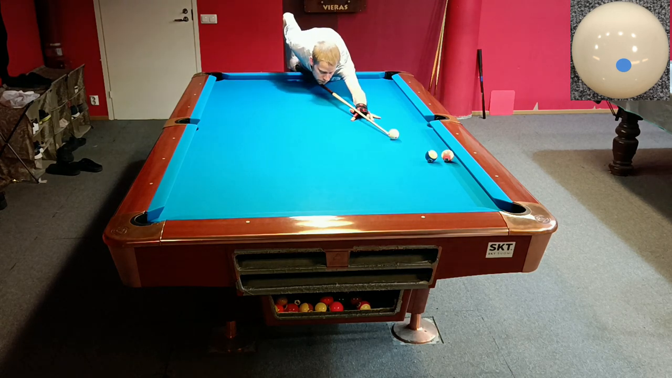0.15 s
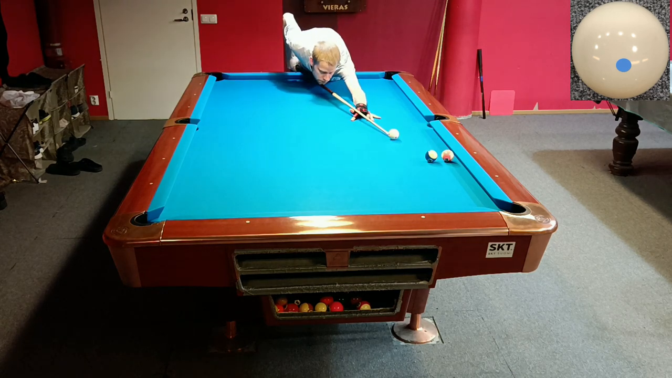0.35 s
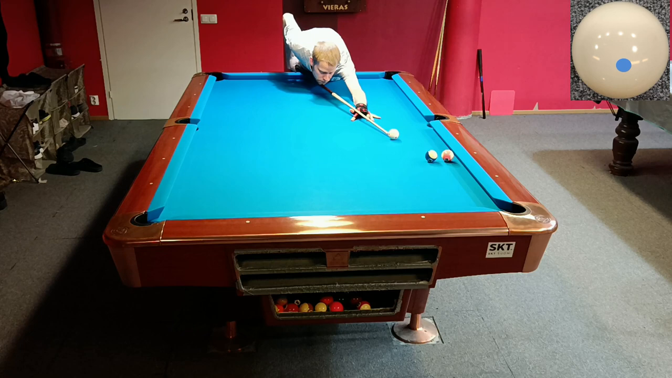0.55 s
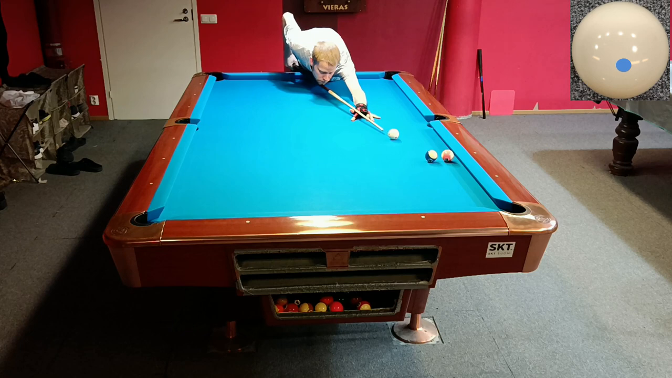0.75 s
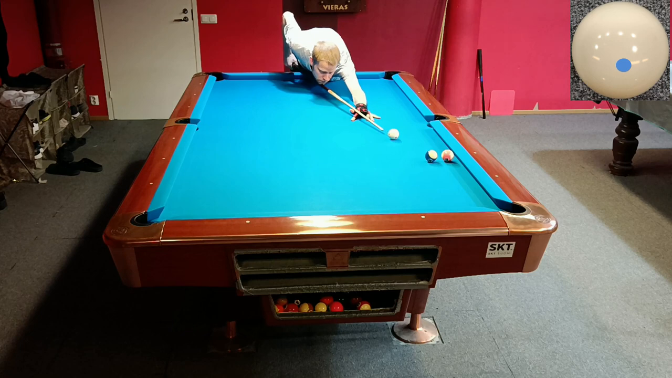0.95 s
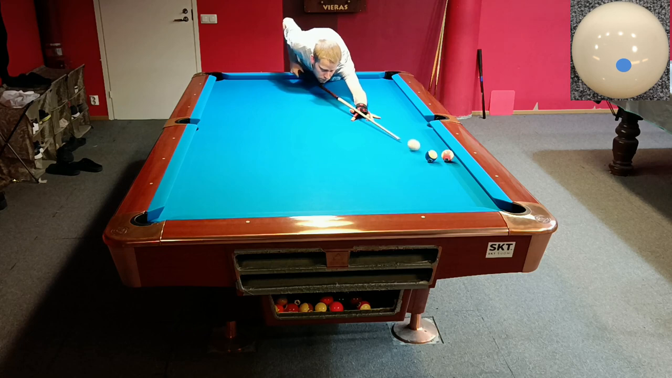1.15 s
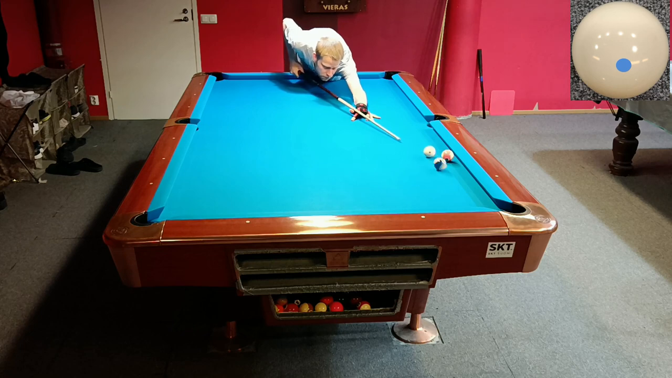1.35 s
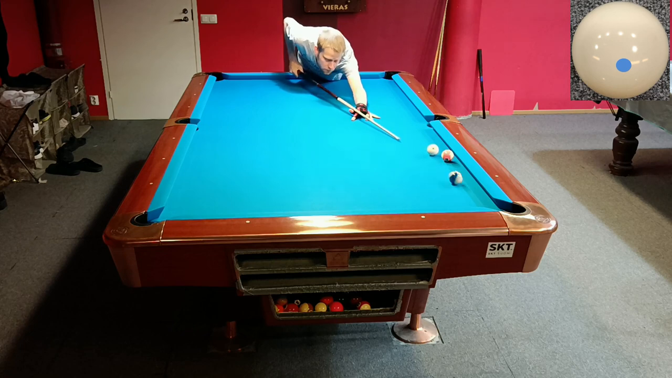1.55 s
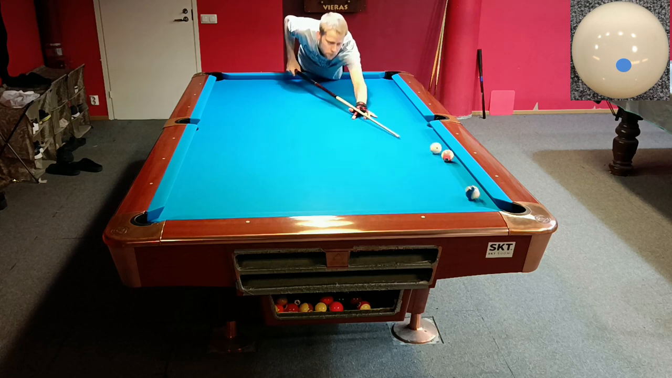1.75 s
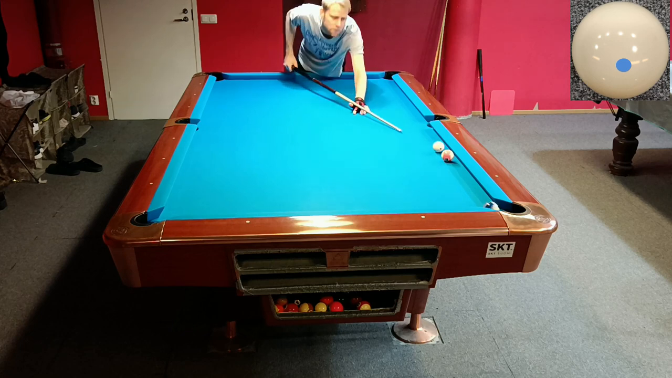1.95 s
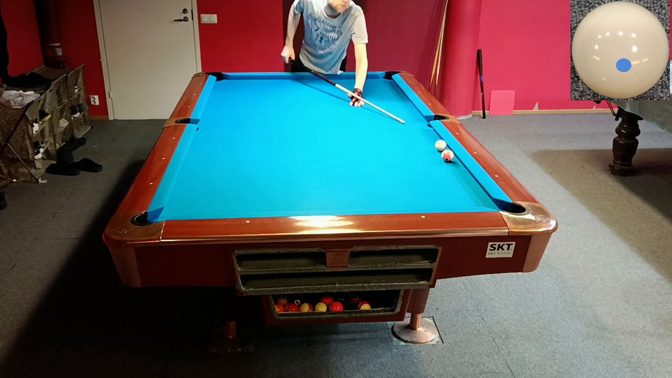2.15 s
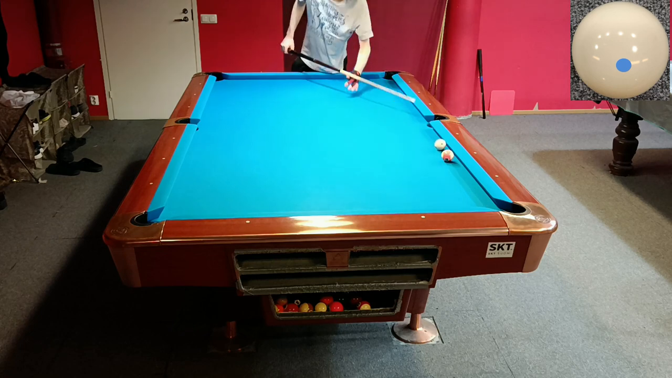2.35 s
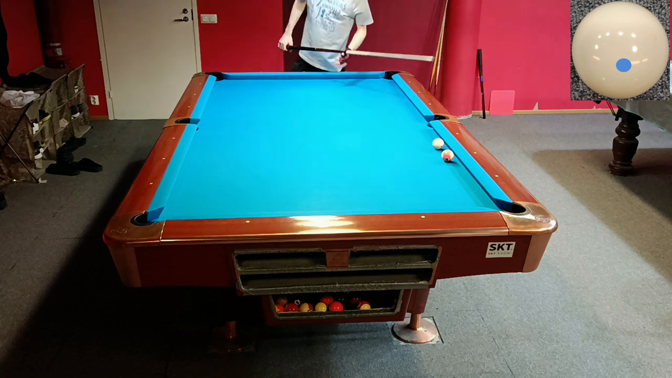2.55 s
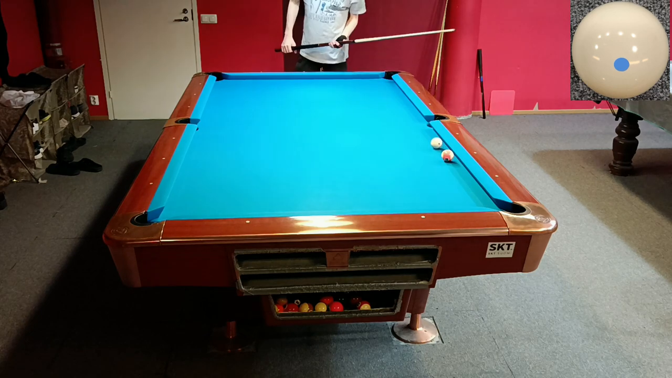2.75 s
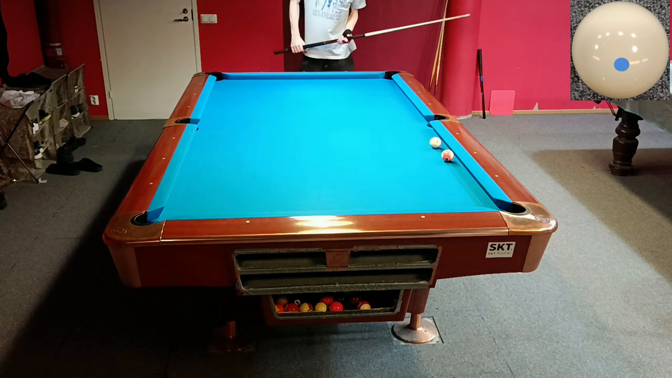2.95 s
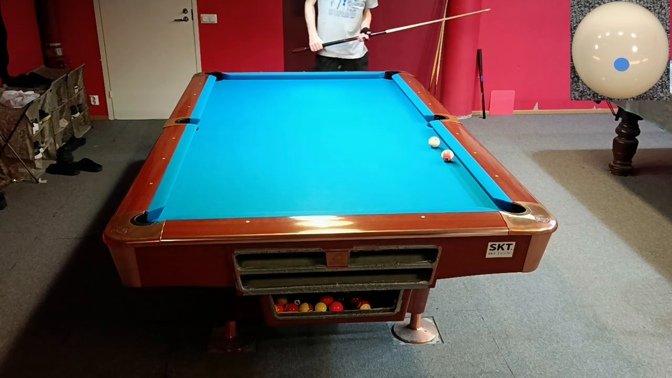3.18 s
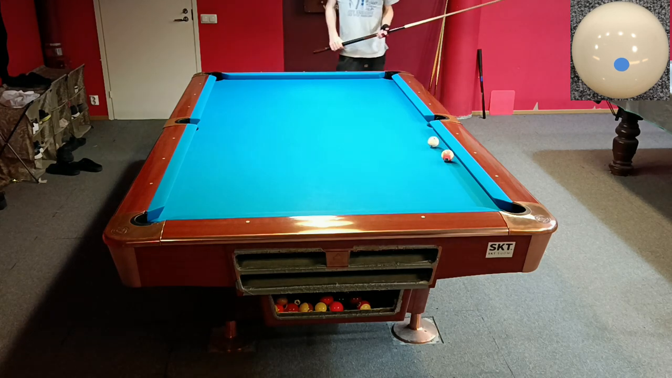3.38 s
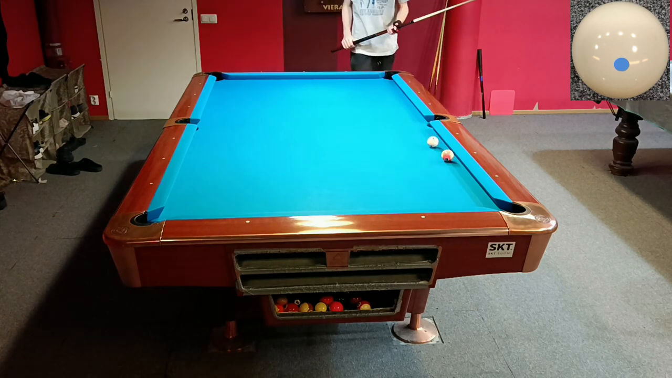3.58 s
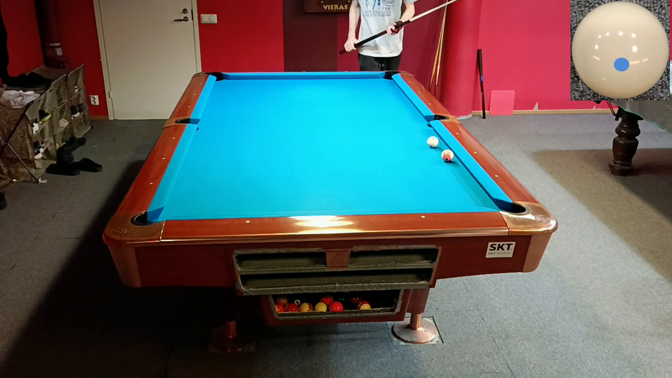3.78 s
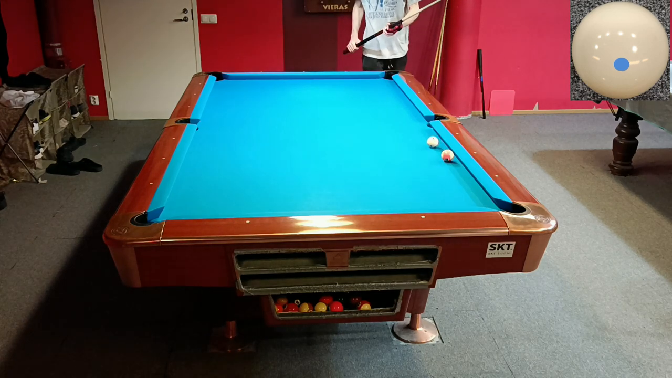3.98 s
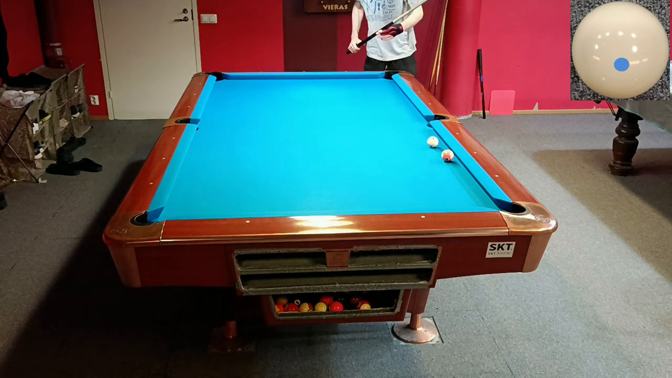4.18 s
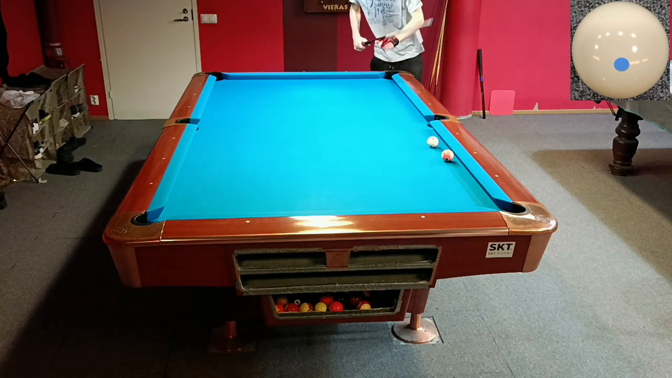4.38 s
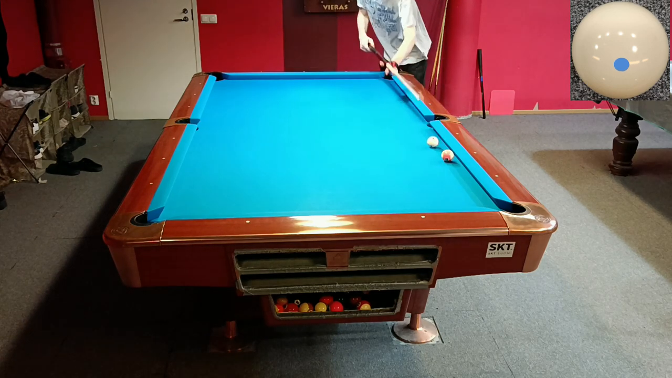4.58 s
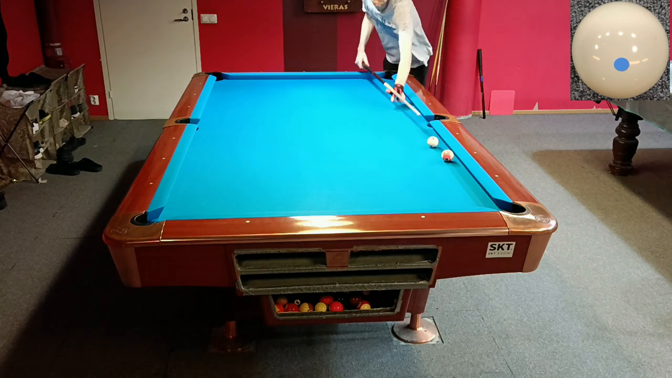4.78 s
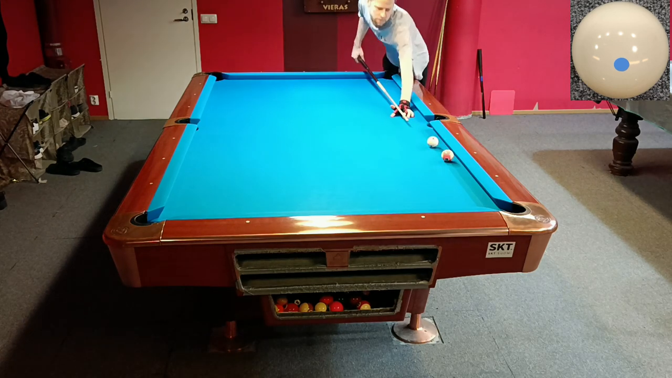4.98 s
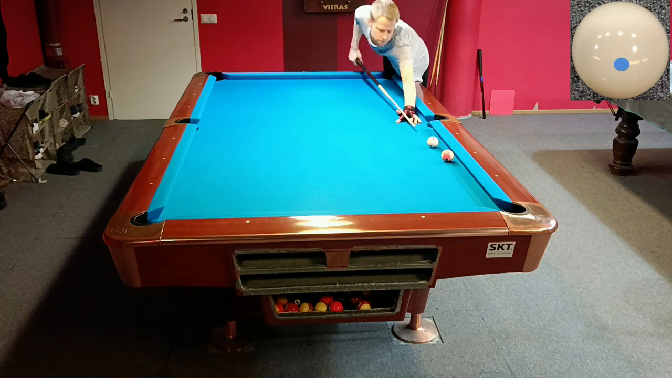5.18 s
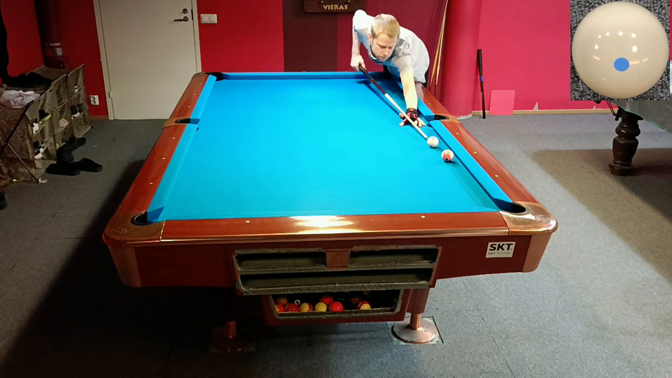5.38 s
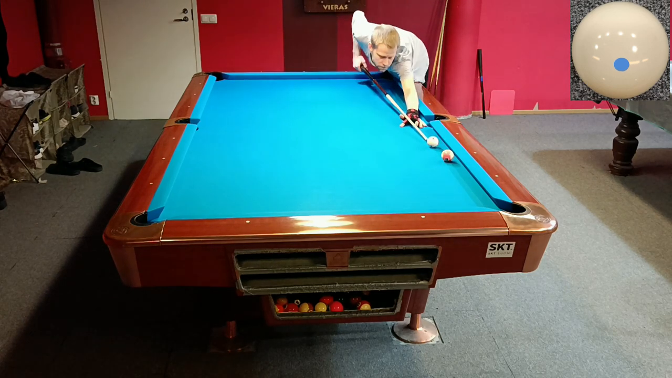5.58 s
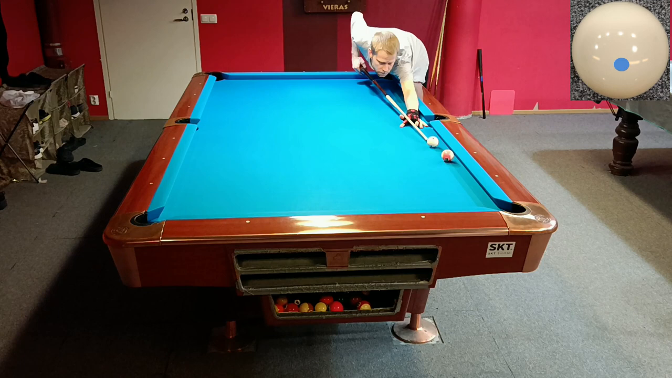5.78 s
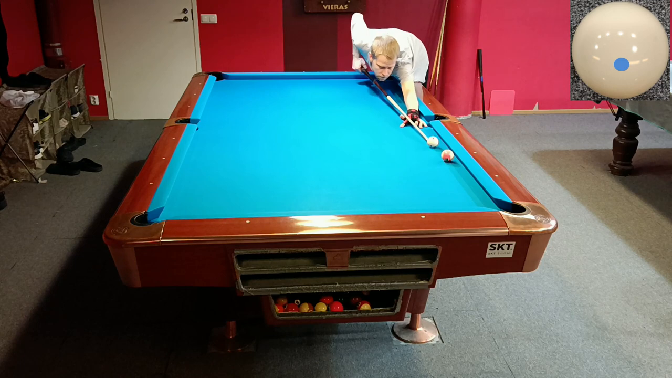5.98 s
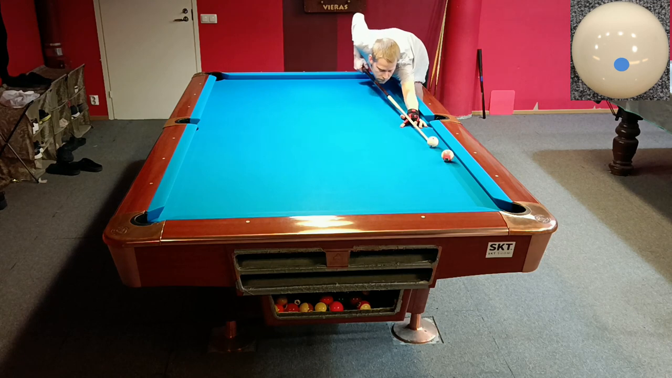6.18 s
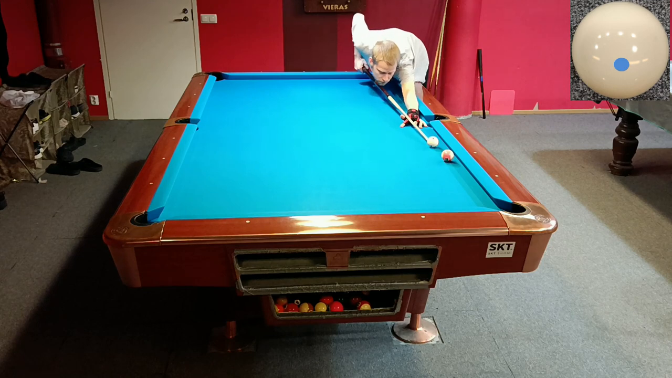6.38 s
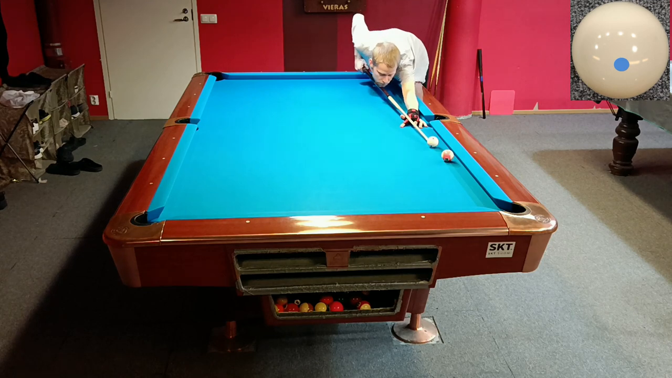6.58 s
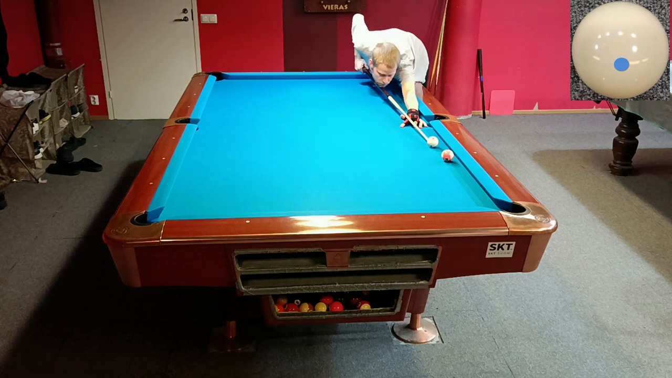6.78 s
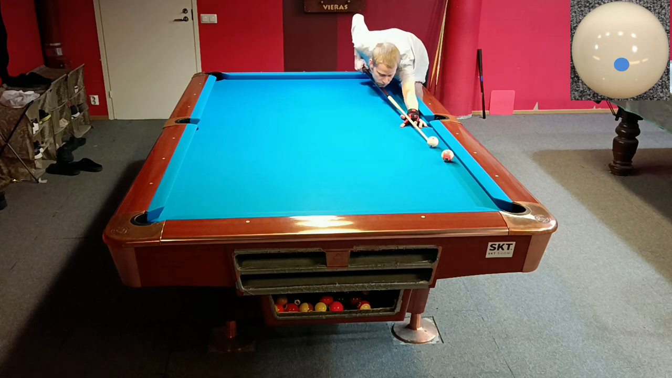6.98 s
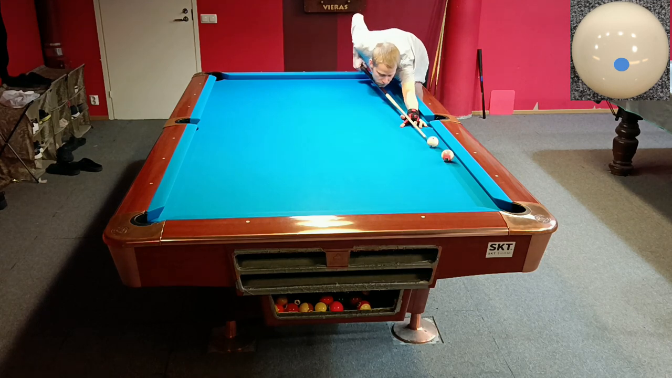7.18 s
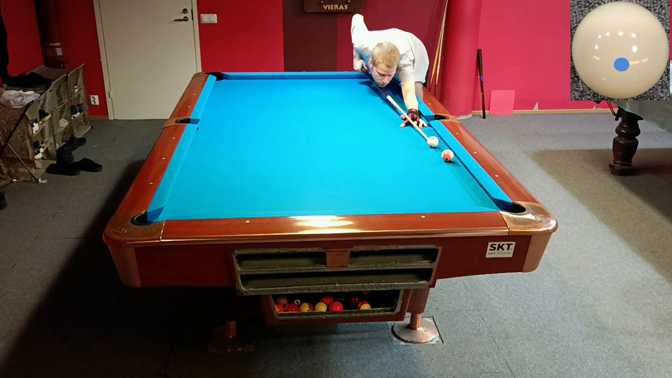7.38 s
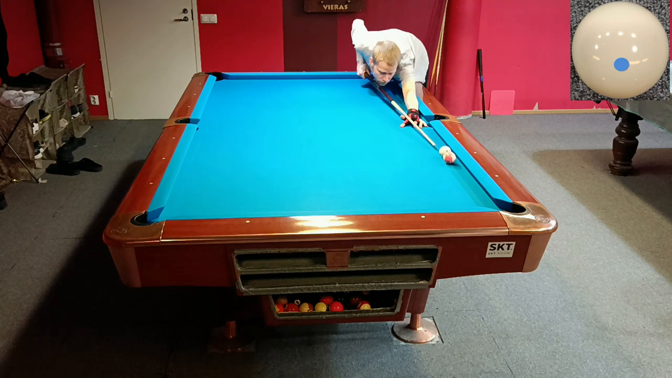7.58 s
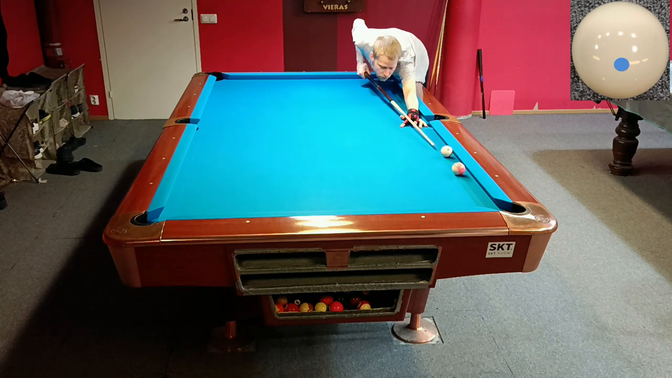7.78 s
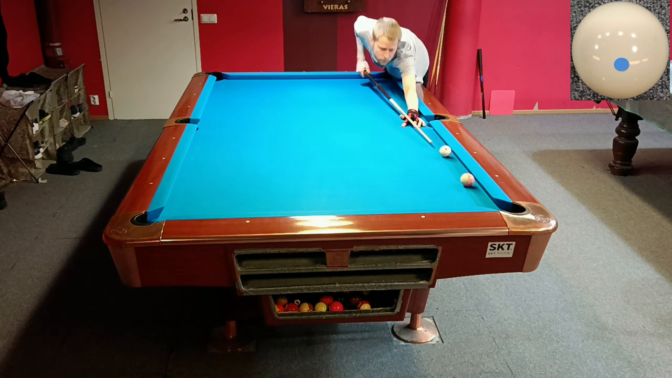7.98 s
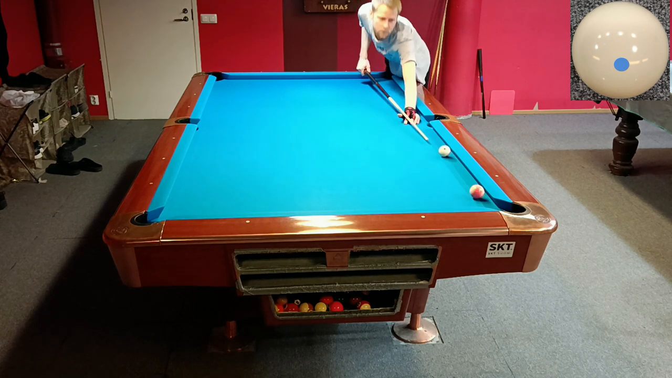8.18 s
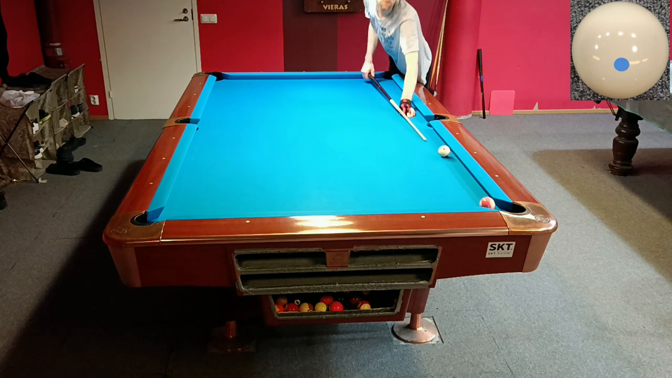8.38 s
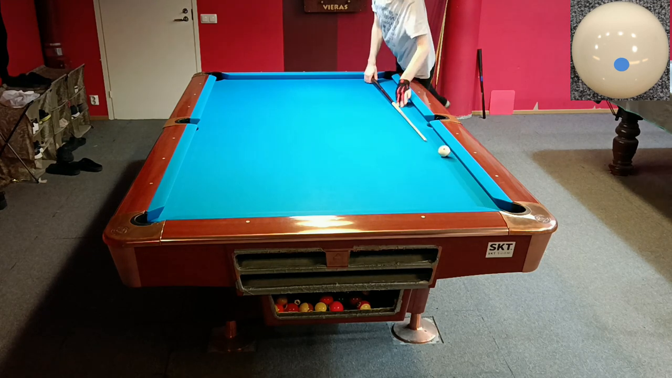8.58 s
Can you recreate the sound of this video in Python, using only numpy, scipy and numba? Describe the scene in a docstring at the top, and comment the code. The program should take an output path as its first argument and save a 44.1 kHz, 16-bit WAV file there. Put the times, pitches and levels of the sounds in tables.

```python
"""Two soft shots on a pool table in a carpeted hall, heard from beyond the foot rail over a low ventilation hum.
The cue slides squeaking over the bridge hand, taps the white, and balls clack by brief elastic contact.
One drops in a pocket, knocks and rumbles down the wooden return and meets the balls in the tray.
Clothes rustle as filtered noise, the cue ticks in the hand and a sleeve whistles over the felt.
A second tap and clack follow, with a last rustle, roll and knock; a decaying noise tail forms the hall."""
import sys
import numpy as np
from scipy import signal
from scipy.fft import rfft, irfft
from scipy.io import wavfile
from scipy.ndimage import uniform_filter1d
from numba import njit

SR = 44100
rng = np.random.default_rng(int(sys.argv[2]) if len(sys.argv) > 2 else 0)


def dump(signal):
    """Clip the signal to [-1, 1] and save it as 16-bit WAV at the path in sys.argv[1]."""
    limited = np.clip(np.atleast_2d(signal).T, -1, 1)
    pcm = np.round(limited * 32767).astype(np.int16)
    wavfile.write(sys.argv[1], SR, pcm)


N = 381465

# Ventilation spectrum. Each row: frequency in Hz, relative level in dB per Hz.
AIR_SPECTRUM = [(20, -52), (45, -29), (65, -12.5), (115, 1), (157, 1), (182, -13.5), (229, -2), (320, -15),
                (420, -19.5), (750, -24.5), (1400, -27.5), (3000, -33.5), (6000, -45), (15000, -55)]
# Fan whistles. Each row: frequency in Hz, width in Hz, rms level in dB.
FAN_WHISTLES = [(454.3, 12, -89), (698, 7.9, -88), (877, 7.5, -91), (1032, 16, -92.5)]
# Likeness of left and right in diffuse sound. Each row: frequency in Hz, likeness from 0 to 1.
LIKENESS = [(60, 0.89), (190, 0.96), (330, 0.67), (590, 0.46), (1040, 0.0773), (3000, 0.11)]
# Cue sliding over the bridge hand. Each row: time a quarter of the way through in seconds, peak in dB,
# pitch in Hz, length in seconds.
CUE_SLIDES = [(0.356, -68, 1890, 0.17), (0.358, -71.5, 2520, 0.072), (1.026, -65.5, 1880, 0.05),
              (6.402, -69.5, 1860, 0.062), (6.639, -76.5, 1910, 0.11), (7.225, -66.5, 1846, 0.071)]
# Cue tip on the white ball. Each row: start in seconds, peak in dB, contact in ms, left minus right in dB,
# rattle peak in dB.
TIP_HITS = [(1.097, -24.5, 0.99, 0.5, -41), (7.489, -31.5, 1.55, 1, -47.5)]
# Modes of the cue shaft. Each row: frequency in Hz, relative level in dB, 60 dB decay time in seconds.
SHAFT_MODES = [(205, -4.5, 0.092), (400.5, 6.5, 0.015), (579, -5, 0.01615), (777, 3, 0.0044),
               (1030, -4.5, 0.022), (1270, -8, 0.036), (1510, -18.5, 0.026), (1833, -10.5, 0.06),
               (2048, -10, 0.069), (2647, -16.5, 0.049), (3100, -28, 0.027), (4480, -7.5, 0.12)]
# Decay of the hall. Each row: frequency in Hz, 60 dB decay time in seconds.
HALL_DECAY = [(100, 0.3), (260, 1), (700, 0.7148), (1800, 0.5529), (3500, 0.62), (6000, 0.16),
              (12000, 0.88)]
# Strength of the hall. Each row: frequency in Hz, gain in dB.
HALL_STRENGTH = [(100, 0), (300, 0), (1000, 0), (3000, 0), (6000, -1), (10000, -4), (15000, -8)]
# First echoes. Each row: delay in ms, left gain in dB, right gain in dB.
FIRST_ECHOES = [(2.742, -0.5, -8.5), (7.715, -7.5, -12), (10.83, -6.5, -6.5), (21.4, -16.5, -16),
                (29.2, -19, -16.5), (33.4, -22.5, -14.5)]
# Ball against ball. Each row: mid-contact in seconds, peak in dB, closing speed in m/s, left minus right in dB,
# hall send relative to the peak in dB, place (0 on the table, 1 in the tray).
BALL_CLACKS = [(1.3231, -9.6, 1.25, -.8, -2.2, 0), (3.8852, -18, .5, -1, -4, 1),
               (3.8875, -19, .9, 1, -6, 1), (3.8942, -17, .8, 0, -7, 1), (3.8968, -22, .8, 0, -7, 1),
               (4.009, -25, .2, 0, -7, 1), (4.2795, -46, .1, 0, -3, 1), (4.324, -54, .08, 0, -3, 1),
               (7.6291, -14.6, .85, -.5, -1.2, 0)]
# How well a pair of balls turns contact force into sound. Each row: frequency in Hz, gain in dB.
BALL_RADIATION = [(200, -50), (500, -26.5), (1000, -8.5), (2000, 6), (3000, 3), (3900, -4), (5000, -7.5),
                  (7000, -10.5), (10000, -9), (15000, -0.5)]
# Ball or hand against cushion or wood. Each row: start in seconds, peak in dB, contact in ms, crack peak in dB,
# crack centre in Hz, snap peak in dB.
WOOD_KNOCKS = [(1.385, -38.5, 4.65, -73, 500, -99), (2.041, -31, 2.62, -58, 890, -95),
               (2.175, -25, 0.56, -29, 1360, -66), (2.499, -24.5, 1.05, -25.5, 1510, -37.5),
               (2.601, -33, 1.3, -37, 1500, -76), (2.904, -25, 1, -33, 1370, -89.5),
               (2.926, -18.5, 0.81, -47.5, 2310, -54.5), (2.977, -24.5, 1.9, -47, 990, -94),
               (3.102, -18.5, 0.74, -35.5, 1280, -52.5), (3.13, -19.5, 1.3, -44.5, 1810, -50.5),
               (3.749, -13.5, 0.81, -26.5, 810, -43), (3.816, -27.5, 1.54, -25, 694, -83),
               (5.297, -47.5, 1.4, -42, 895, -64), (8.543, -37, 2.82, -63, 700, -93)]
# Modes of the table cabinet. Each row: frequency in Hz, relative level in dB, 60 dB decay time in seconds.
CABINET_MODES = [(86.4, -0.5, 0.25), (128.8, -8.5, 0.42), (168.3, 0.5, 0.053), (230.7, -1.5, 0.1),
                 (256.5, -2, 0.079), (287.7, -1, 0.084), (318.8, -12.5, 0.44), (356, -5, 0.059),
                 (408, -3.5, 0.066), (449.6, -7, 0.14), (532, -9, 0.078), (588, -5.5, 0.059),
                 (676, -1, 0.055), (810, -1, 0.025), (989, -6, 0.058), (1336, -16, 0.26)]
# Movements of clothes and sleeve. Each row: start in seconds, rise in seconds, hold in seconds, fall in seconds,
# hiss level in dB, fold resonance in Hz before its drift.
CLOTH_MOVES = [(1.44, 0.43, 0.36, .4, -70.5, 1610), (4.539, 0.057, 0.0092, .12, -68.5, 2200),
               (4.638, .015, 0.009, 0.3, -67.5, 1970), (4.797, .15, 0.13, 0.18, -71.5, 2160),
               (4.95, 0.19, 0.17, 0.66, -66.5, 1884), (7.926, 0.29, 0.21, 0.72, -68.5, 1620)]
# Fabric hiss spectrum. Each row: frequency in Hz, relative level in dB per Hz.
CLOTH_SPECTRUM = [(500, 6), (1000, -1.5), (2000, 7), (4000, -1.5), (8000, -6.5), (15000, -20.5)]
# Ball rolling along stretches of track. Each row: start in seconds, length in seconds, drumming level in dB,
# deep rumble level in dB, grit level in dB.
TRACK_ROLLS = [(2.04, 0.032, -45.5, -63, -90), (2.173, 0.082, -46, -47, -47), (2.506, 0.094, -47, -48, -51),
               (2.901, 0.16, -35, -49.5, -42), (3.108, 0.17, -31, -48.5, -42),
               (3.754, 0.11, -39.5, -54.5, -42), (8.515, 0.066, -50, -58, -90)]
# Light ticks as the cue is taken in hand. Each row: start in seconds, peak in dB.
CUE_TICKS = [(4.562, -55.5), (4.589, -65), (4.653, -62), (4.834, -68), (4.963, -67)]
# Modes of a tick. Each row: frequency in Hz, relative level in dB, 60 dB decay time in seconds.
TICK_MODES = [(1940, -7, 0.048), (2576, -2, 0.083), (3560, 6, 0.033), (4840, 9, .05), (5800, 0.5, 0.046),
              (6730, -4.5, 0.055), (7600, -12.5, .05)]
# Sleeve sweeping the felt. Each row: start in seconds, length in seconds, level in dB, first pitch in Hz.
SLEEVE_SWEEPS = [(4.806, 0.074, -76, 2540), (5.044, 0.12, -72, 1630)]
# Treble lift of the microphone. Each row: frequency in Hz, gain in dB.
TREBLE_LIFT = [(9000, 0), (12000, 1), (15500, 7.5)]

AIR_DB = -62.5
SWELL_DB = 30  # rises start this far below the top; rise and fall times cover this range
SHAFT_LAG_S, SHAFT_DB = .006, 13.5  # shaft slaps the bridge hand after the tip lands; level re rattle
HALL_DB = 9  # gain of the tail
OPEN_RISE_S, TRAY_RISE_S = 0.0063, 0.0031  # the open table fills the hall slowly, the cabinet sooner
TRAY_RING_HZ = 900  # bandwidth of the ring of packed balls
GRATE_DB, GRATE_DB_PER_M_S = -31, 29  # grating re the clack at 1 m/s; faster balls grate more
KNOCK_PAN_DB = 0.5  # left minus right
FOLD_DB, FOLD_WANDER, FOLD_TURN_S = -2.5, 0.22, .06  # level re hiss; log-pitch drift (std), time between turns
BUMPS_PER_S, BUMP_CAP = 1100, .02  # mean rate; the cap limits the largest bumps
DRUM_RISE_S, DRUM_FALL_S = 0.026, 0.042
DEEP_RISE_S, DEEP_FALL_S = 0.072, 0.36
GRIT_RISE_S, GRIT_FALL_S = .005, 0.15  # bites at once, dies away as the ball settles; fall adds the length
TICK_SCATTER_DB = 3
SWEEP_RISE_S, SWEEP_FALL_S, SWEEP_SAG = 0.024, 0.16, 0.9  # sag: falling rate of log pitch, per s
PORT_LAG = 4  # samples by which the left port hears the table later
TOP_HZ = 15760


def undb(db):
    """Decibel law: amplitude grows tenfold every 20 dB."""
    return 10 ** (np.asarray(db) / 20)


def along(table, hz):
    """Interpolation of (Hz, value) points on a logarithmic frequency axis."""
    points = np.array(table)
    return np.interp(np.log(hz + 1), np.log(points[:, 0]), points[:, 1])


def colour(x, table):
    """Spectral shaping: each Fourier component is scaled by (Hz, dB) points."""
    size = x.shape[-1]
    gain = undb(along(table, np.fft.rfftfreq(size, 1 / SR)))
    return irfft(rfft(x) * gain, size)


def unit(x):
    """Normalisation to a root-mean-square of 1."""
    return x / np.sqrt(np.mean(x ** 2))


def wide(size):
    """Diffuse-field coherence: two noises alike in the bass and nearly unrelated in the treble."""
    alike = np.clip(along(LIKENESS, np.fft.rfftfreq(size, 1 / SR)), 0, 1)
    shares = np.sqrt([(1 + alike) / 2, (1 - alike) / 2])
    mid, side = rfft(rng.standard_normal((2, size))) * shares
    return irfft(np.array([mid + side, mid - side]), size)


@njit
def svf(x, hz, width):
    """State-variable resonance: a band-pass with a moving centre and gain 1 there."""
    y, b, l = np.empty(len(x)), 0., 0.
    for i in range(len(x)):
        g, k = np.tan(np.pi * hz[i] / SR), width / hz[i]
        v = (b + g * (x[i] - l)) / (1 + g * (g + k))
        b, l, y[i] = 2 * v - b, l + 2 * g * v, k * v
    return y


def band(x, hz, width):
    """Fixed resonance: a band-pass of constant centre and width in Hz."""
    return svf(x, np.full(len(x), 1. * hz), 1. * width)


def push(ms, size):
    """Elastic contact: a half-sine to the power 1.5 gives the force over ms."""
    phase = np.clip(np.arange(size) / SR * 1000 / ms, 0, 1)
    return np.sin(np.pi * phase) ** 1.5


def burst(rise_s, t60):
    """Exponential transient: a short puff of noise that builds and decays."""
    t = np.arange(SR // 8) / SR
    return rng.standard_normal(len(t)) * (1 - np.exp(-t / rise_s)) * 1000 ** (-t / t60)


def swell(s, rise, hold, fall, db):
    """Logarithmic envelope: silent before s, then climbs to db, holds and falls in straight dB lines."""
    t = np.arange(N) / SR - s
    climb = np.minimum(t / rise - 1, 0)
    descent = (rise + hold - t) / fall
    return (t > 0) * undb(db + SWELL_DB * np.minimum(climb, descent))


def ring(force, modes, scatter_db=0.):
    """Modal superposition: a force drives decaying sines, weighted anew on each call as by a new spot."""
    t = np.arange(SR // 2) / SR
    spot = undb(scatter_db * rng.standard_normal(len(modes))) * rng.choice([-1, 1], len(modes))
    body = np.zeros(len(t))
    for weight, (hz, db, t60) in zip(spot, modes):
        body += weight * undb(db) * np.sin(2 * np.pi * hz * t) * 1000 ** (-t / t60)
    return signal.fftconvolve(force, body)[:len(force)]


def add(out, sound, s, db, pan_db):
    """Linear superposition: a sound joins at s, peaking at db, with its level split left to right."""
    i = int(s * SR)
    n = min(len(sound), N - i)
    sides_db = np.array([[pan_db], [-pan_db]]) / 2
    out[:, i:i + n] += sound[:n] / np.abs(sound).max() * undb(db + sides_db)


def air():
    """Broadband flow noise: a low ventilation hum drifts slowly in level, with narrow-band whistles."""
    noise = wide(N)
    steps = rng.standard_normal(N // 4000 + 1).repeat(4000)[:N]
    drift_db = 0.51 * uniform_filter1d(steps, size=4000)
    out = unit(colour(noise, AIR_SPECTRUM)) * undb(AIR_DB + drift_db + np.array([[.6], [-.6]]))
    for hz, width, db in FAN_WHISTLES:
        out += undb(db) * unit(band(noise[0] + noise[1], hz, width))
    return out


def slides():
    """Friction: the cue squeaks faintly over the bridge hand as narrow-band noise."""
    out = np.zeros((2, N))
    for s, db, hz, length in CUE_SLIDES:
        n = int(length * SR)
        squeak = band(rng.standard_normal(n), hz, 49) * np.hanning(n)
        add(out, squeak, s - length / 4, db, 0)
    return out


def cue():
    """Impact excitation: the leather tip thuds; the shaft rings and chatters over the bridge hand."""
    out = np.zeros((2, N))
    for s, db, ms, pan_db, rattle_db in TIP_HITS:
        jolt = band(band(np.diff(push(ms, size=SR // 8)), 600, 1200), 500, 1500)
        add(out, band(np.gradient(jolt), 600, 1600), s, db, pan_db)
        slap = np.diff(push(.42 * ms, size=SR // 2))
        add(out, ring(slap, SHAFT_MODES, 2.), s + SHAFT_LAG_S, rattle_db + SHAFT_DB, pan_db)
        rattle = band(band(burst(0.0053, 0.065), 1300, 3000), 1800, 2800)
        add(out, rattle, s, rattle_db, pan_db)
    return out


def hall(x, rise_s):
    """Reverberation: first echoes off table and walls, and a tail that swells in and dies band by band."""
    t = np.arange(SR) / SR
    noise, tail = rfft(wide(SR)), np.zeros((2, SR))
    octave = np.log2(np.fft.rfftfreq(SR, 1 / SR) + 1)
    for k in np.arange(5., 15.):  # overlapping octave bands centred near 2 ** k Hz
        part = irfft(noise * np.clip(1 - np.abs(octave - k), 0, 1), SR)
        tail += part * 1000 ** (-t / along(HALL_DECAY, 2 ** k))
    tail = tail * (1 - np.exp(-t / rise_s)) * undb(HALL_DB) / np.sqrt(SR / 20)
    for ms, *db in FIRST_ECHOES:
        tail[:, int(ms * SR / 1000)] += undb(db)
    return signal.fftconvolve(x, colour(tail, HALL_STRENGTH), axes=1)[:, :N]


def clacks():
    """Elastic collision: hard balls shove the air apart within a ms; returns direct and hall-bound shares."""
    near, far = np.zeros((2, N)), np.zeros((2, 2, N))
    for s, db, speed, pan_db, hall_db, place in BALL_CLACKS:
        ms = .385 * speed ** -.2  # faster balls part sooner
        force = np.roll(push(ms, size=512), 256 - int(ms * SR / 2000))  # contact centred in the window
        pop, start = -colour(force, BALL_RADIATION), s - 256 / SR
        if place:  # balls packed in the tray pass the blow on and ring for a few cycles
            pop = band(pop, 1000 / ms, TRAY_RING_HZ)
        add(far[int(round(place))], pop, start, db + hall_db, 0)
        add(near, pop, start, db, pan_db)
        grate = np.diff(rng.standard_normal(12))  # the surfaces grate as they touch
        add(near, grate, s, db + GRATE_DB + GRATE_DB_PER_M_S * (speed - 1), pan_db)
    return near, far


def knocks():
    """Forced vibration: each blow rings the cabinet, with a short crack of the boards and a bright snap."""
    out = np.zeros((2, N))
    for s, db, ms, crack_db, crack_hz, snap_db in WOOD_KNOCKS:
        blow = band(np.diff(push(ms, size=SR // 2)), 500, 1900)
        add(out, ring(blow, CABINET_MODES, 5.25), s, db, KNOCK_PAN_DB)
        crack = burst(0.0024, 0.057)
        for widening in (1.2, 1.4, 1.9):
            crack = band(crack, crack_hz, widening * crack_hz)
        add(out, crack, s, crack_db, KNOCK_PAN_DB)
        snap = band(band(burst(0.0014, 0.073), 3600, 5000), 4200, 8500)
        add(out, snap, s, snap_db, KNOCK_PAN_DB)
    return out


def rustle():
    """Random fibre friction: flickering fabric hiss with a drifting fold resonance."""
    gains = np.array([swell(*move[:5]) for move in CLOTH_MOVES])
    turns = rng.standard_normal(1000)
    wander = np.interp(np.arange(N) / SR / FOLD_TURN_S, np.arange(len(turns)), turns)
    loudest = gains.argmax(axis=0)  # the strongest movement sets the resonance
    fold_hz = np.array(CLOTH_MOVES)[loudest, -1] * np.exp(FOLD_WANDER * wander)
    flicker_db = 0.94 * rng.standard_normal(N // 200 + 1).repeat(200)[:N]
    fibres = wide(N) * undb(flicker_db)
    folds = np.array([svf(side, fold_hz, 570.0) for side in fibres])
    hiss = unit(colour(fibres, CLOTH_SPECTRUM))
    return gains.sum(axis=0) * (hiss + undb(FOLD_DB) * unit(folds))


def roll():
    """Rolling excitation: small random bumps of the track drum the cabinet, shake the frame and grate."""
    chance = rng.random((3, N))
    heights = (2 * chance[1] - 1) * undb(-2.5 * np.log(chance[2] + BUMP_CAP))
    bumps = (chance[0] < BUMPS_PER_S / SR) * heights
    drum = unit(ring(band(band(bumps, 266.5, 280), 255, 540), CABINET_MODES))
    deep = unit(band(band(band(bumps, 120, 120), 83, 130), 100, 160))
    grit = unit(band(band(band(bumps, 1100, 1100), 1300, 1500), 1200, 1500))
    out = np.zeros(N)
    for s, length, drum_db, deep_db, grit_db in TRACK_ROLLS:
        out += drum * swell(s, DRUM_RISE_S, length, DRUM_FALL_S, drum_db)
        out += deep * swell(s, DEEP_RISE_S, length, DEEP_FALL_S, deep_db)
        out += grit * swell(s, GRIT_RISE_S, 0, GRIT_FALL_S + length, grit_db)
    return out


def ticks():
    """Modal response: the cue ticks against the hand, short noise bursts ringing its modes."""
    out = np.zeros((2, N))
    for s, db in CUE_TICKS:
        add(out, ring(burst(.001, 0.011), TICK_MODES, TICK_SCATTER_DB), s, db, 0)
    return out


def sweeps():
    """Resonant air noise: a sleeve sweeping the felt whistles with falling pitch."""
    out, t = np.zeros((2, N)), np.arange(N) / SR
    hiss = wide(N)
    for s, length, db, hz in SLEEVE_SWEEPS:
        pitch_hz = hz * np.exp(-SWEEP_SAG * np.clip(t - s, 0, 1))
        whistle = np.array([svf(side, pitch_hz, 110.0) for side in hiss])
        out += swell(s, SWEEP_RISE_S, length, SWEEP_FALL_S, db) * unit(whistle)
    return out


def scene():
    """Direct and reverberant fields: table sounds arrive both ways; slides, clothes and air directly."""
    near, (far, tray) = clacks()
    taps = cue() + ticks() + sweeps()
    wood = knocks() + roll()
    open_hall = hall(far + undb(-3.5) * taps, OPEN_RISE_S)
    tray_hall = hall(tray + undb(-6) * wood, TRAY_RISE_S)
    table = near + taps + wood + open_hall + tray_hall
    table[0] = np.roll(table[0], PORT_LAG)
    return table + rustle() + slides() + air()


def record(dry):
    """Linear filtering: the microphone lifts the highest treble and a steep low-pass cuts the top."""
    lifted = colour(dry, TREBLE_LIFT)
    low_pass = signal.ellip(10, .2, 70, TOP_HZ, fs=SR, output="sos")
    return signal.sosfilt(low_pass, lifted)


dry = scene()
out = record(dry)
dump(out)
```